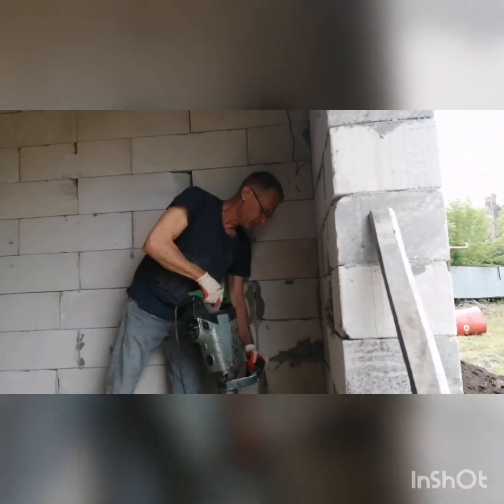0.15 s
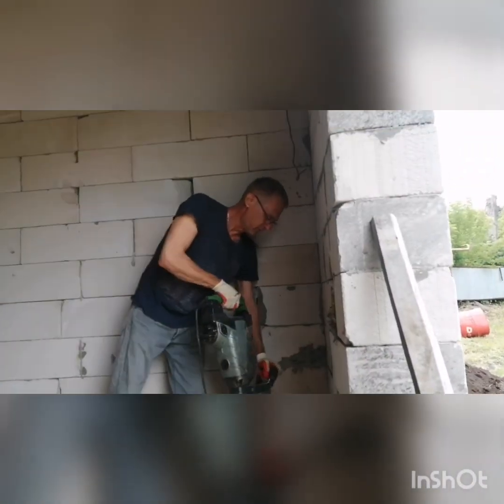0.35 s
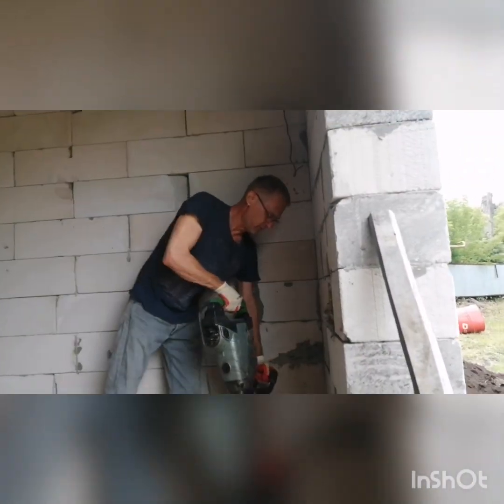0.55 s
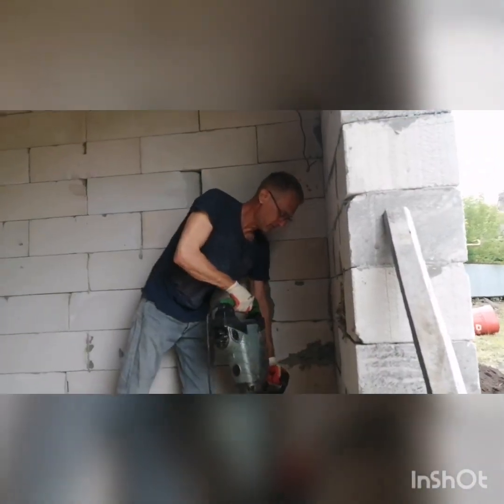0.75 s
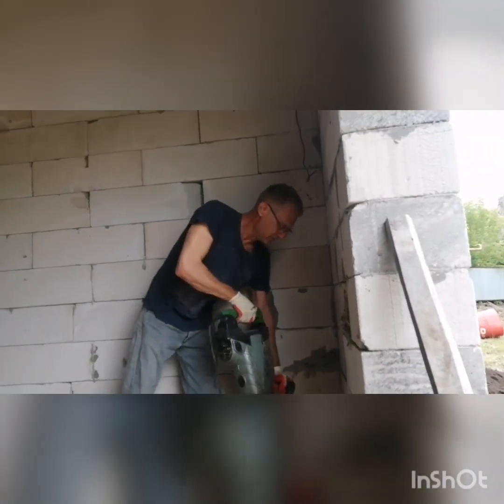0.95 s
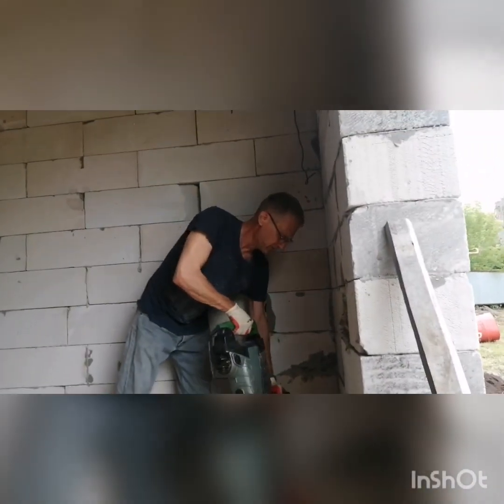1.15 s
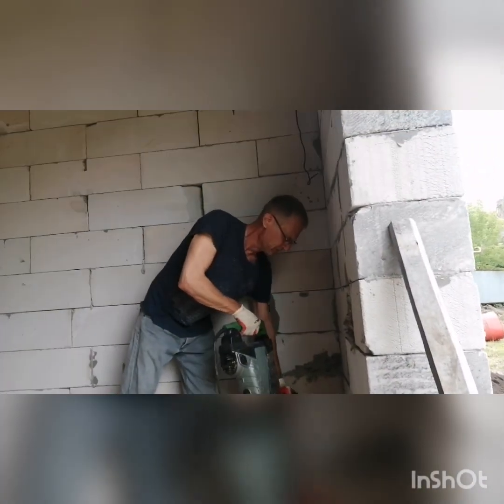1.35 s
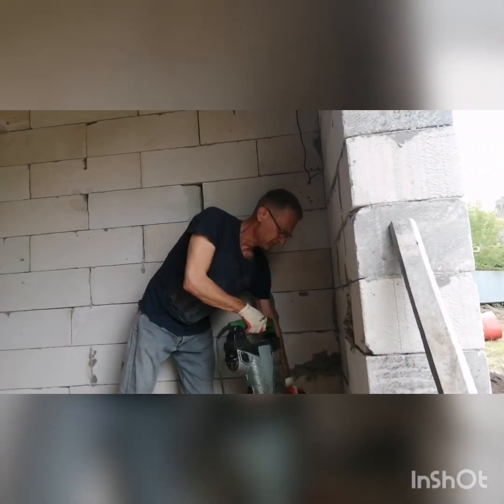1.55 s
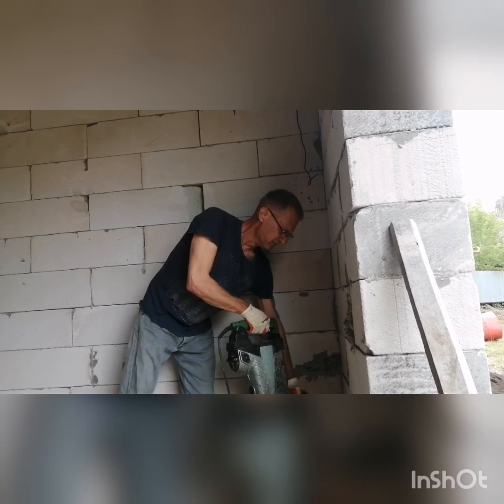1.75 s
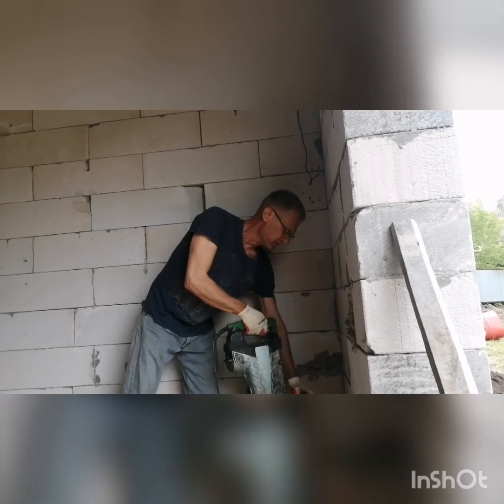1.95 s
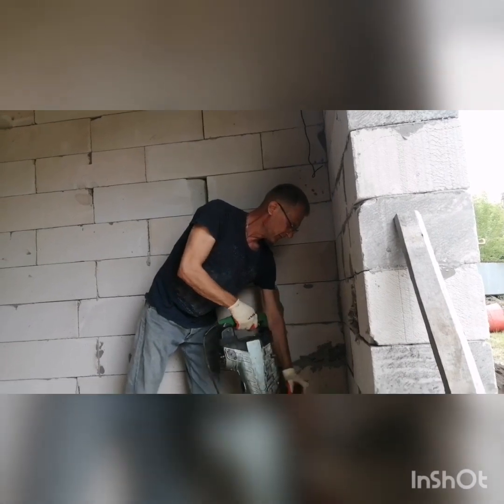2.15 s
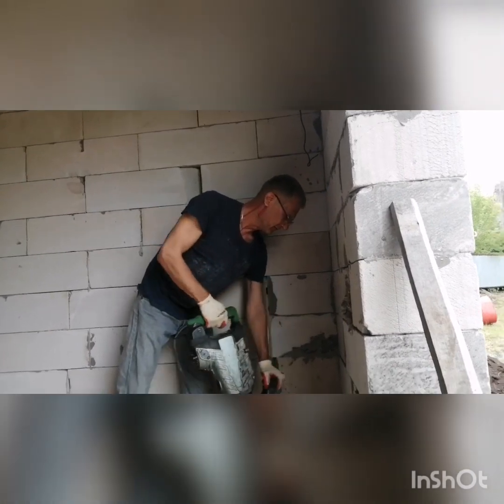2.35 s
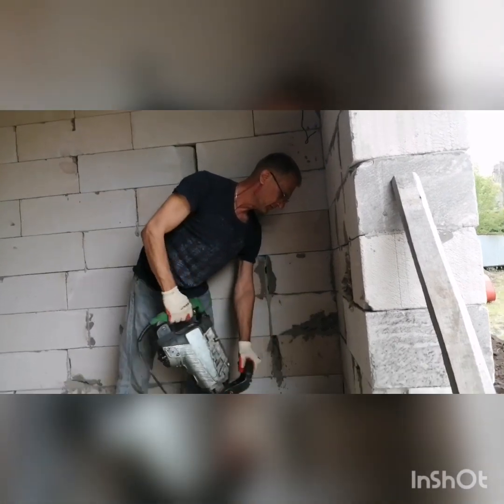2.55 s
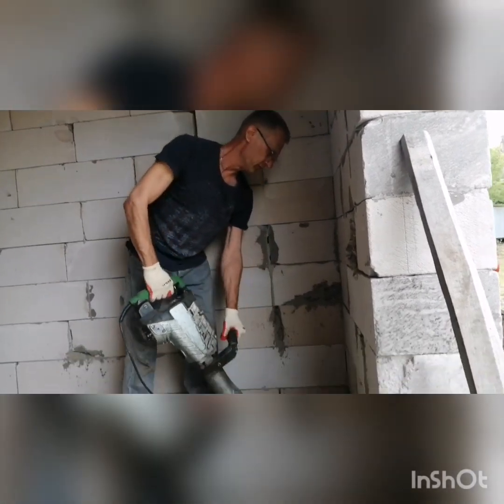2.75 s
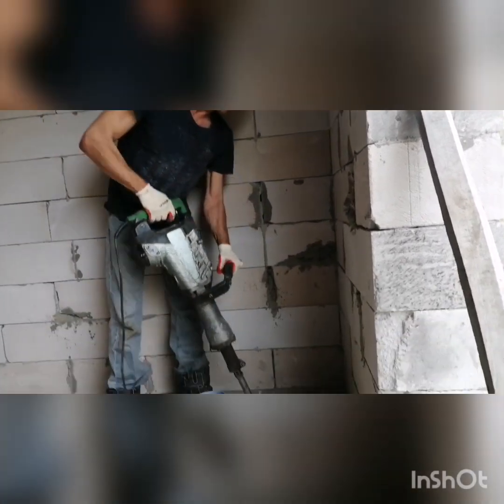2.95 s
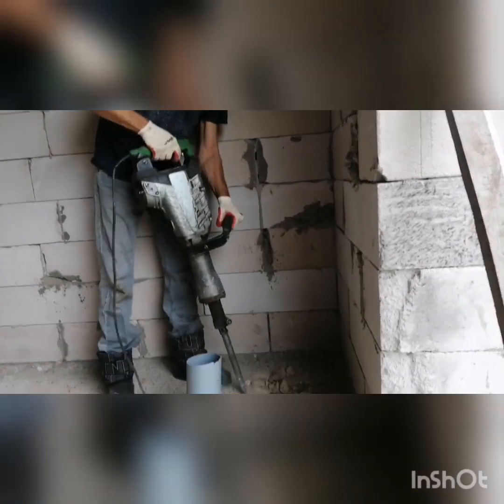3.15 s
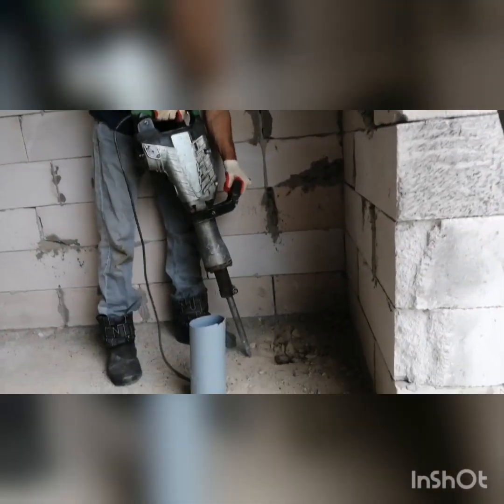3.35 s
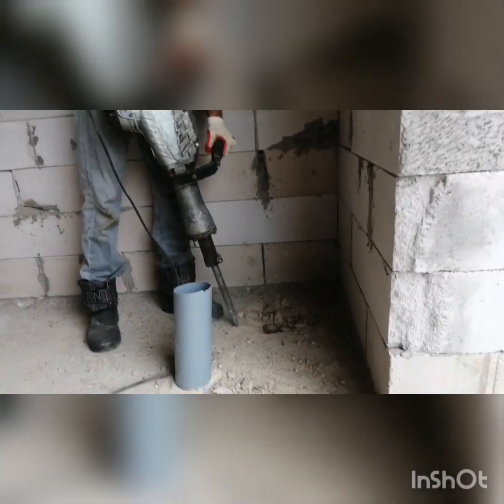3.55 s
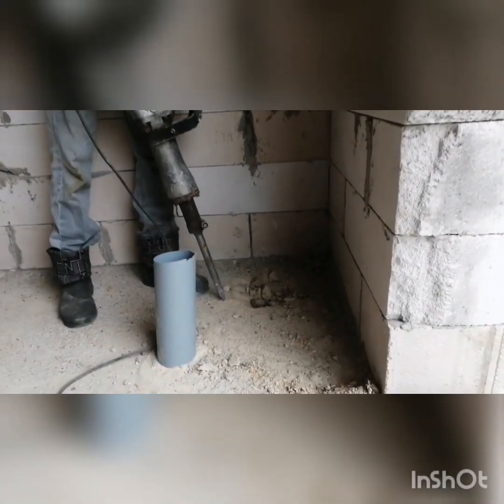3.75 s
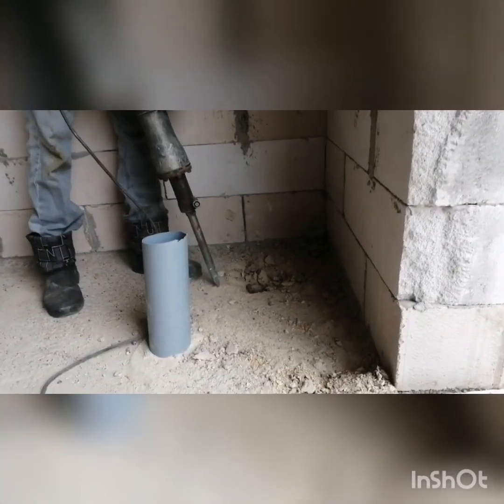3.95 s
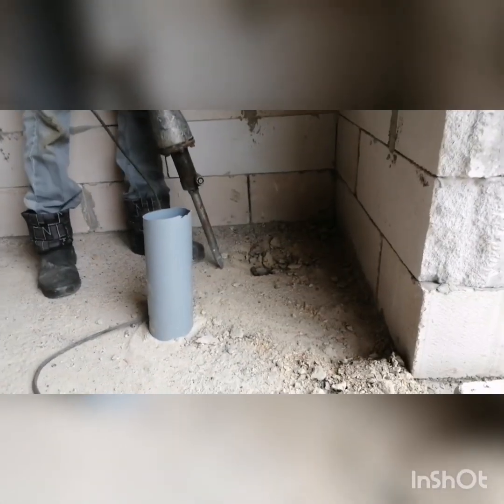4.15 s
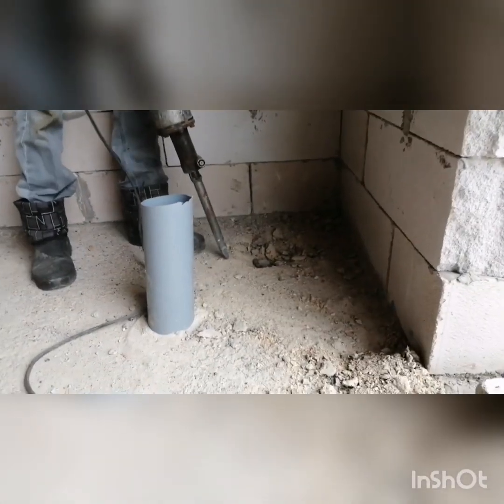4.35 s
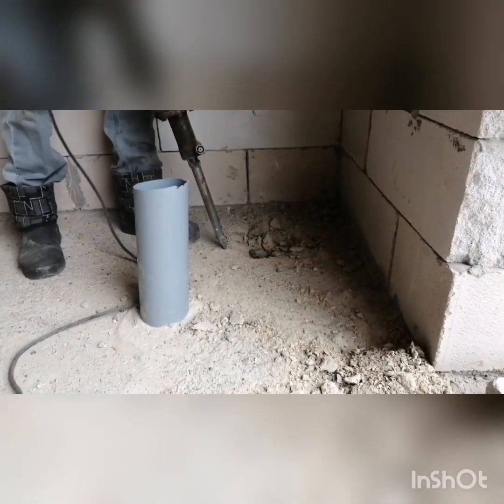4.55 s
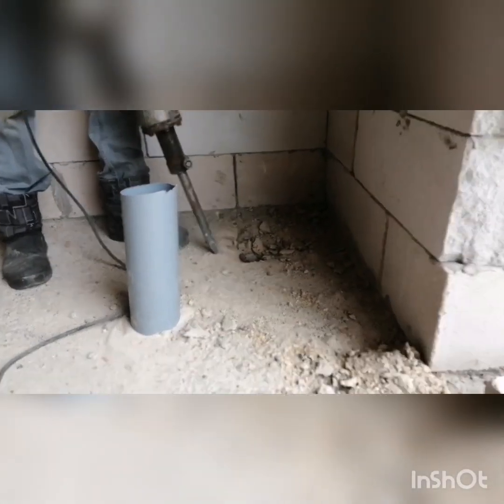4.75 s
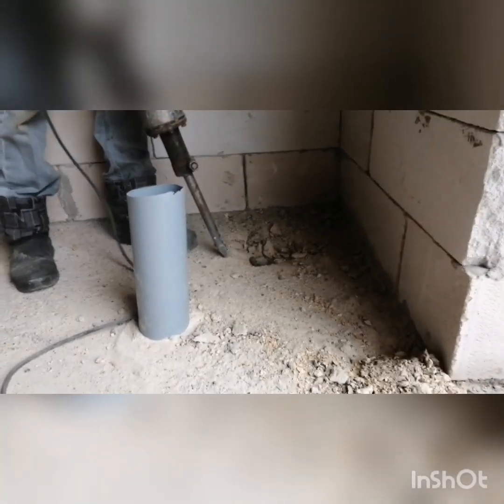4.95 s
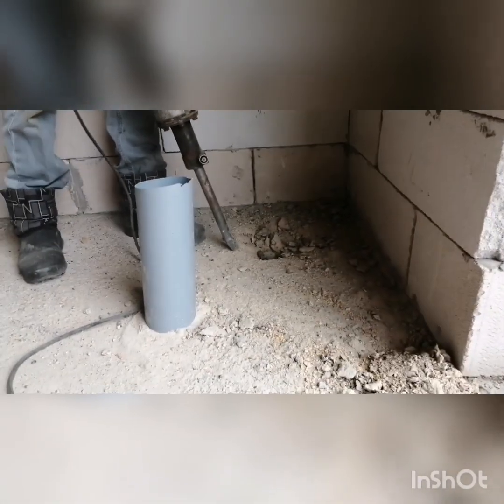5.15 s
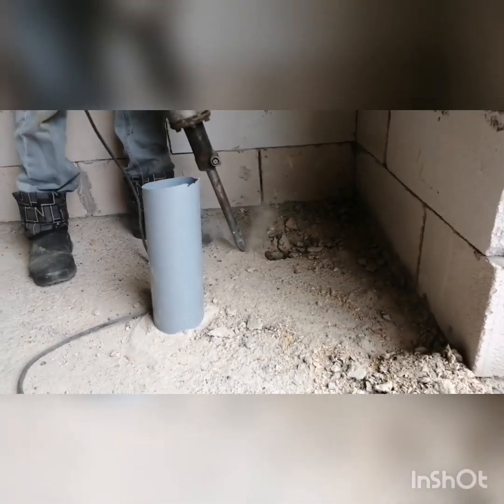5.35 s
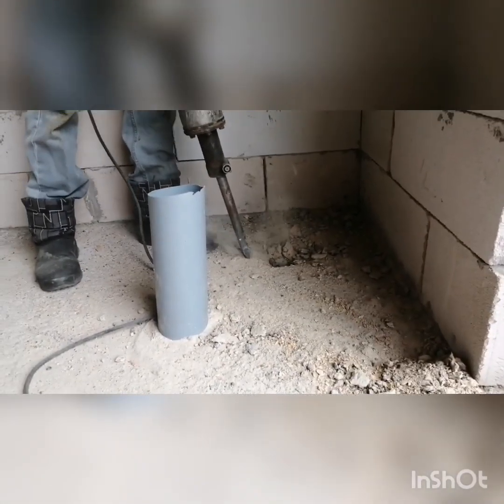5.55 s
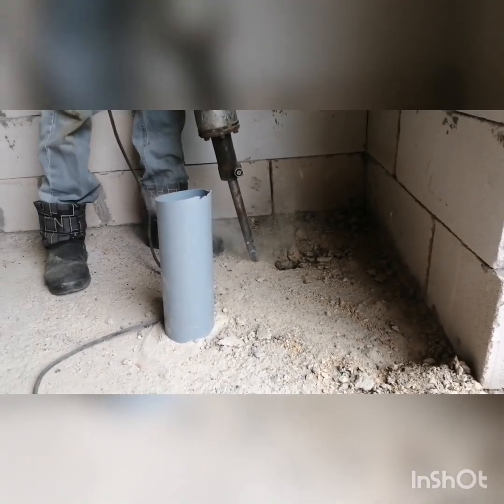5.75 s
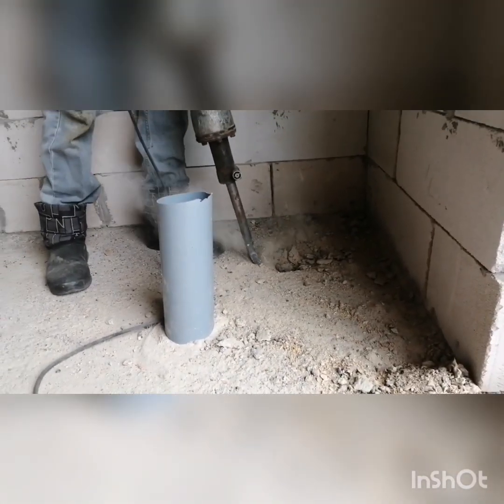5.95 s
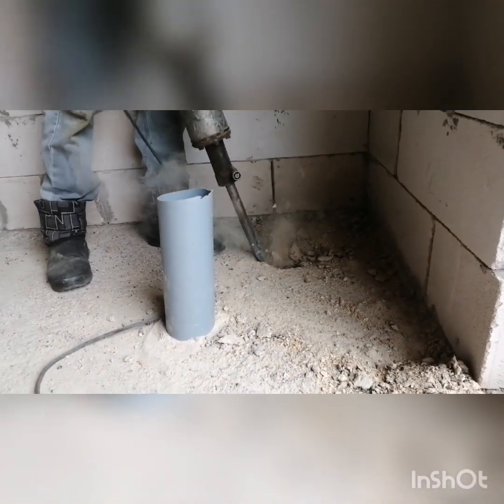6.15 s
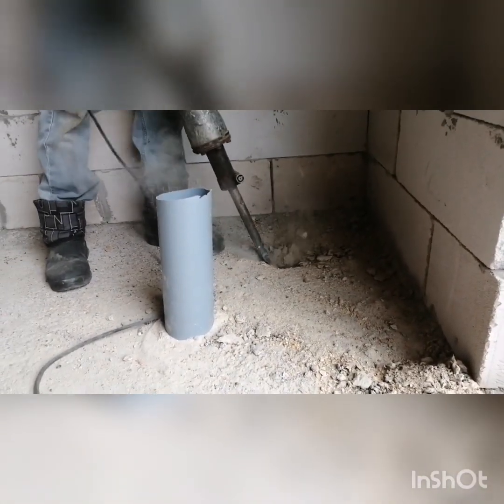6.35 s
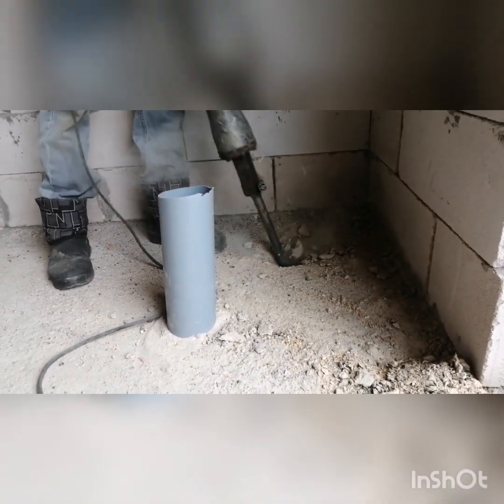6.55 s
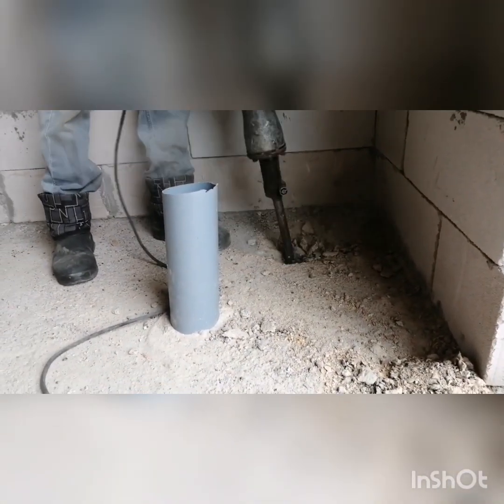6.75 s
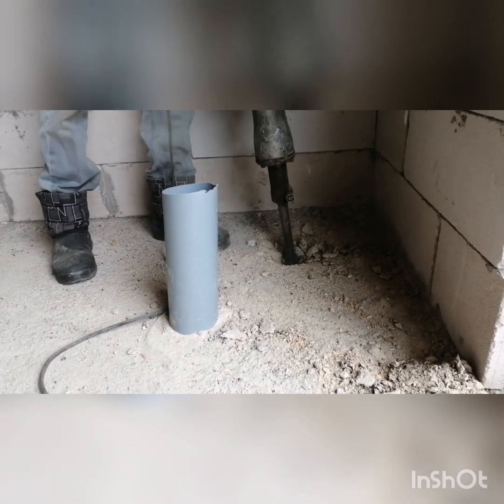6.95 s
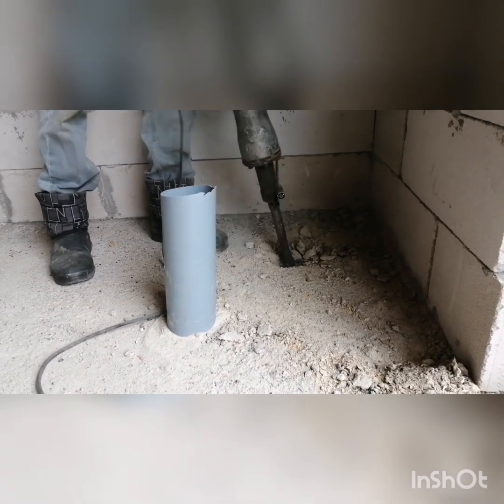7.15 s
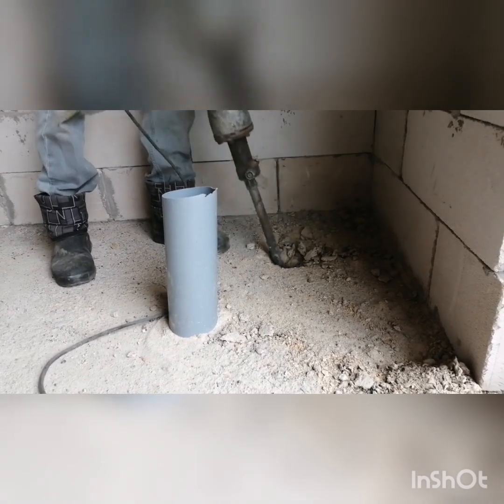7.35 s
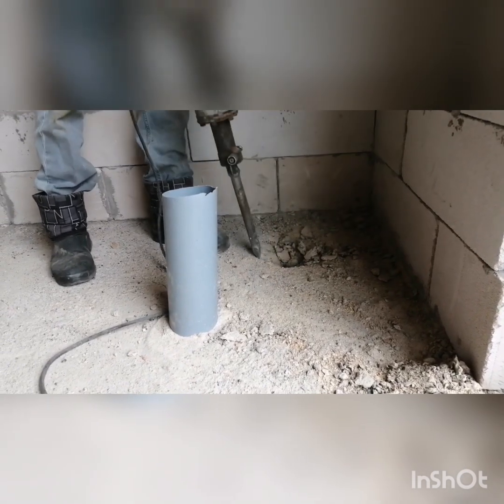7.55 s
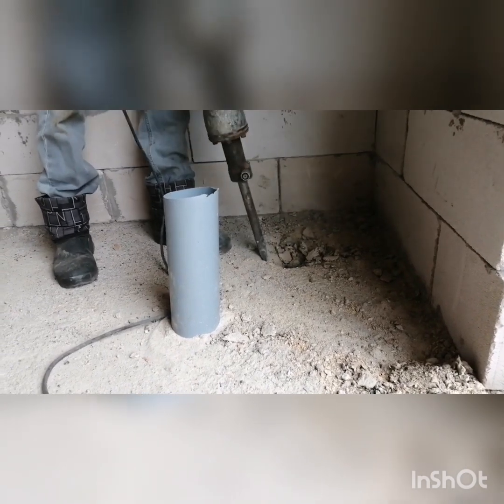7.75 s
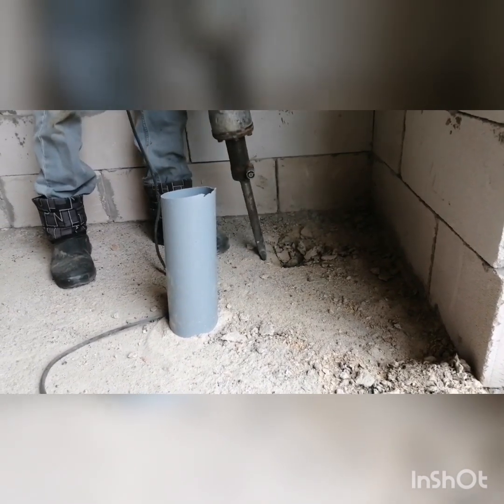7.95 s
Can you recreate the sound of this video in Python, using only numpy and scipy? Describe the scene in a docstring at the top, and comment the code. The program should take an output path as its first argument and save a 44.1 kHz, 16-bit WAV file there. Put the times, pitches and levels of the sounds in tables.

```python
"""Demolition hammer on a concrete floor

An electric hammer chisels concrete in a bare block-walled room, in two bursts that each run down blow by blow.
Every blow excites a damped slab, low room-corner modes and tool modes, bursts of crack noise and the ringing
steel chisel. Between bursts the tool is shifted: the chisel knocks in its holder and judders in stick-slip over
the floor. Motor noise follows speed and load, and decaying noise bands form the room's reverberation."""
import sys
import numpy as np
from scipy import signal
from scipy.fft import rfft, irfft, next_fast_len
from scipy.io import wavfile
from scipy.ndimage import uniform_filter1d, map_coordinates

SR = 44100
rng = np.random.default_rng(int(sys.argv[2]) if len(sys.argv) > 2 else 0)


def transcribe(signal):
    """Save signal, clipped to [-1, 1], as a 16-bit WAV file at the path in sys.argv[1]."""
    frames = np.atleast_2d(signal).T
    limited = np.clip(frames, -1, 1)
    pcm = np.round(limited * 32767).astype(np.int16)
    wavfile.write(sys.argv[1], SR, pcm)


N = 356769
TIME = np.arange(N) / SR   # [s]

# levels in the tables are relative: each source adds its own gain
# tool holder modes: (frequency [Hz], level [dB], t60 [s], roughness [0-1])
HOLDER_MODES = [(1051, 4.5, 0.068, 0.5), (1197, -5, 0.066, .1), (2227, -8, .06, .1), (2633, 0.5, .06, 0.4),
                (3030, -7, .05, .1)]
# noise spectrum of the rumbling casing and rattling housing: (frequency [Hz], level [dB])
RUMBLE_SPECTRUM = [(30, -27), (120, -32.5), (200, 2.5), (300, 3), (440, -2.5), (680, -1), (2000, -57.5)]


def hammer():
    """Impact excitation: steady and lone driven blows strike the same chisel, tool and floor."""
    # blows heard singly as the striker starts and runs down: (time [s], slab thud [dB],
    # barrel clank [dB], housing [dB], chisel ring [dB], crack [dB])
    lone_blows = [(0.488, -35, -21, -34, -42, -33), (.513, -42, -22.5, -34, -21.5, -27),
                  (2.072, -66, -58, -34.5, -30, -36), (2.145, -61, -54, -40, -30, -36),
                  (2.227, -45, -35, -32.5, -32.5, -33), (2.327, -49, -33.5, -30.5, -34, -33),
                  (2.451, -56, -30.5, -33.5, -35.5, -32), (2.615, -56, -36, -38.5, -39.5, -34.5),
                  (6.992, -38, -44, -34.5, -30.5, -26.5), (7.064, -43, -51, -40, -29.5, -31),
                  (7.153, -41, -38, -39, -26.5, -29)]
    steady = steady_blows()
    s, thud, clank, housing, chisel, crush = np.vstack([steady, lone_blows]).T
    is_steady = np.arange(len(s)) < len(steady)
    shock_db = np.where(is_steady, -16, -22.5)   # a lone blow shakes the floor less
    rows = np.c_[s, housing, thud, clank, chisel, crush]
    blows = contacts(rows, slab_db=5.5, housing_db=-2.5, shock_db=shock_db, barrel_db=-1.0,
                     chisel_db=-2.5, crack_db=1.5, slab_hz=942, crack_t60=0.043, ring_share=0.97)
    return blows + casing_rumble(s, housing - 28) + tool_body(s + 0.00105, thud, clank)


def steady_blows():
    """Crank kinematics give one blow a turn; the chisel's seating sets what answers, with random scatter."""
    # rate of the striker in each burst, as it spins up, works and runs down: (time [s], rate [blows/s])
    striker_rates = [
        [(0.458, 0.0), (0.525, 21.12), (1.136, 20.55), (1.18, 26.14), (1.226, 20.92), (1.946, 20.49),
         (1.986, 16.0), (2.455, 6.77), (3.218, 0.0)],
        [(5.059, 0.0), (5.111, 12.55), (5.364, 20.48), (5.834, 21.81), (6.127, 20.64), (6.37, 22.88),
         (6.85, 22.51), (6.974, 15.48), (7.5, 0.0)],
    ]
    # the steady part of each burst: (start [s], end [s])
    working_spans = [(.54, 2.04), (5.1, 6.96)]
    # moments when the chisel bites extra hard: (time [s], extra housing level [dB])
    hard_bites = [(.66, 8.5), (.8, 8), (5.2, 5), (6.57, 16), (6.88, 2)]
    # moments when the chisel bounces and rings out: (time [s], extra ring level [dB])
    hard_rings = [(.755, 3), (.947, 6.5), (.995, 4.5), (1.755, 6), (6.53, 5)]
    hard_crack_share = 0.27   # part of a hard bite's extra level that also goes into the crack
    scatter_db, bite_ring_db = 1.0, 1   # spread from blow to blow; a blow that bites rings less

    s = np.concatenate([blow_times(rate, span) for rate, span in zip(striker_rates, working_spans)])
    bite, *chance = rng.standard_normal((len(s), 6)).T
    thud, clank, housing, chisel, crush = seating(s) + scatter_db * np.array(chance)
    for when, extra_db in hard_bites:
        nearest = np.argmin(np.abs(s - when))
        housing[nearest] += extra_db
        crush[nearest] += hard_crack_share * extra_db
    for when, extra_db in hard_rings:
        chisel[np.argmin(np.abs(s - when))] += extra_db
    return np.c_[s, thud, clank, housing, chisel - bite_ring_db * bite, crush]


def blow_times(rate, span):
    """Phase accumulation: the striker lands halfway through every turn of the crank."""
    turns = np.cumsum(in_time(rate)) / SR
    s = np.interp(np.arange(.5, turns[-1]), turns, TIME)
    return s[(s > span[0]) & (s < span[1])]


def seating(times):
    """Contact coupling: how the chisel is seated sets the level of each response at the given times."""
    # in each burst: (time [s], slab thud [dB], barrel clank [dB], housing [dB], chisel ring [dB], crack [dB])
    seat_levels = [
        [(.52, -33, -26, -31.5, -27.5, -28), (.88, -26, -22, -31.5, -32, -30),
         (1.12, -46, -38, -39.5, -31.5, -29.5), (1.3, -51, -36, -31, -33, -30.5),
         (2.0, -62, -41, -35.5, -31, -30.5)],
        [(5.12, -24, -34, -28.5, -31.5, -27), (5.3, -25.5, -31.5, -29.5, -29.5, -26),
         (5.5, -21.5, -31, -30.5, -36.5, -24), (5.74, -22, -29.5, -31.5, -34, -25.5),
         (5.84, -20, -27.5, -27, -28.5, -26.5), (5.93, -19.5, -31.5, -30, -32, -23.5),
         (6.11, -22.5, -22.5, -41, -33.5, -25.5), (6.18, -31, -34.5, -32, -35, -24),
         (6.53, -27.5, -29, -31, -31, -26), (6.61, -45, -42, -69, -29.5, -28.5),
         (6.8, -36, -35, -38, -33.5, -26), (6.88, -44, -32.5, -46, -28.5, -25),
         (6.93, -40, -51, -47, -33.5, -31)],
    ]
    s, *columns = np.vstack(seat_levels).T
    return [np.interp(times, s, column) for column in columns]


def contacts(rows, slab_db, housing_db, shock_db, barrel_db, chisel_db, crack_db,
             slab_hz, crack_t60, ring_share):
    """Shared impact: one contact of steel and floor excites modes and noise bursts together."""
    # chisel modes, before each call scales their ring times: (frequency [Hz], level [dB], t60 [s], roughness
    # [0-1])
    chisel_modes = [(2320, -14.5, 0.25, 0.8), (4397, -7, 0.14, 0.88), (5200, -9.5, 0.08, .95),
                    (6714, 2.5, 0.22, 0.15), (6707, 6.5, 0.1, 1), (6810, -4.5, 0.46, 0.07),
                    (6980, 8, 0.029, 0.29), (7220, -6.5, 0.093, 0.7), (7130, 0.5, 0.037, 0.73),
                    (9560, -6, 0.2, 0.1), (9760, -5.5, 0.055, .95), (12740, -5.5, 0.13, 0.9),
                    (13030, -13, 0.61, .7), (13960, -13.5, .22, .85)]
    # dense clank of the barrel's other parts: (frequency [Hz], level [dB])
    clank_spectrum = [(1500, -8), (2000, -4), (2270, -3.5), (2650, -1.5), (2950, -1), (3400, -0.5),
                      (4000, -46)]
    # cracking concrete: (frequency [Hz], level [dB])
    crack_spectrum = [(500, -12), (1200, 3.5), (1600, -3), (3000, 4), (3800, 1), (4400, 7), (5400, 6.5),
                      (7000, 7), (8200, 2.5), (11000, -1), (12800, 1), (14800, 5.5), (16000, -39)]

    s, housing, thud, clank, chisel, crush = np.transpose(rows)
    floor = slab(s - .0005, thud + slab_db, slab_hz)
    jolt_db = housing + housing_db
    drone = corner_ring(s - .001, jolt_db)
    # loose parts of the housing
    rattle = clatter(s - .001, jolt_db + 1, RUMBLE_SPECTRUM, t60=0.027, rebound_db=-34.0)
    shock = floor_shock(s - .002, 0.49 * housing + 0.34 * thud + shock_db)
    barrel = clatter(s + 0.001, clank + barrel_db, clank_spectrum, t60=0.043, rebound_db=-12.5)
    crack = clatter(s + 0.00058, crush + crack_db, crack_spectrum, crack_t60, rebound_db=-11.0)
    # each call scales the ring times: driven blows keep nearly all, knocks of the idle tool somewhat less
    modes = [(hz, db, t60 * ring_share, rough) for hz, db, t60, rough in chisel_modes]
    # the ring reaches each port differently
    steel = [detuned(struck(modes, s + 0.00066, chisel + chisel_db, spread_s=0.0016), wander_s=0.000204)
             for port in range(2)]
    return floor + drone + rattle + shock + barrel + crack + np.array(steel)


def slab(times, level_db, hz):
    """Heavy damping: three equal resonances in series let the floor swing only once or twice."""
    swing = np.eye(1, 1024)[0]   # a single impulse
    for _ in range(3):
        swing = ring(swing, hz, 0.0016)
    swing = np.diff(swing)
    swing = swing / np.abs(swing).max()
    return signal.oaconvolve(clicks(times, from_db(level_db)), swing)[:N]


def struck(modes, times, level_db, spread_s, scatter_db=2):
    """Modal synthesis: each blow reaches each mode with its own strength and lag; chatter roughens the ring."""
    out = 0
    chatter = rms_one(drift(330))
    for hz, mode_db, t60, rough in modes:
        lag, strength = rng.standard_normal((len(times), 2)).T
        sizes = from_db(level_db + mode_db + scatter_db * strength)
        rough = np.clip(rough, 0, 1)
        roughness = np.sqrt(1 - rough) + np.sqrt(rough) * chatter
        out = out + roughness * ring(clicks(times + spread_s * np.abs(lag), sizes), hz, t60)
    return out


def detuned(x, wander_s):
    """Varying delay: changing contact pressure pulls the steel's pitch to and fro."""
    return map_coordinates(x, [(TIME + wander_s * drift(25)) * SR], order=3, prefilter=False)


def clatter(times, level_db, spectrum, t60, rebound_db):
    """Decaying noise: a dense burst at each contact, and a second one on the rebound."""
    chance = rng.standard_normal((len(times), 2))
    first = clicks(times, from_db(level_db))
    rebound_times = times + 0.0191 + 0.0037 * chance[:, 0]
    second = clicks(rebound_times, from_db(level_db + rebound_db + 2 * chance[:, 1]))
    envelope = uniform_filter1d(fading(first + second, t60), size=80)
    return envelope * rms_one(coloured(air_noise(), spectrum))


def corner_ring(times, level_db):
    """Fixed eigenmodes: every jolt sets the room corner droning on the same few low notes."""
    # (frequency [Hz], level [dB])
    corner_modes = [(190, -14.5), (218, -19.5), (261, -15), (293, -20), (342, -19.5), (381, -18.5),
                    (430, -19.5), (582, -19), (692, -27)]
    jolts = clicks(times, from_db(level_db))
    out = 0
    for k, (hz, db) in enumerate(corner_modes):
        out = out + (-1) ** k * from_db(db) * ring(jolts, hz, t60=0.12)   # neighbours in opposite phase
    return out


def casing_rumble(times, level_db):
    """Slow energy decay: every jolt leaves the heavy casing rumbling."""
    # (frequency [Hz], level [dB])
    casing_spectrum = [(60, -22), (150, -7.5), (192, 1), (235, -3), (290, -6.5), (370, -22.5), (700, -21),
                       (1500, -61)]
    envelope = fading(clicks(times, from_db(level_db)), t60=0.6)
    return envelope * rms_one(coloured(air_noise(), casing_spectrum))


def tool_body(times, thud_db, clank_db):
    """Modal response: a solid blow makes the holder knock and the barrel clank, each at its own pitches."""
    # (frequency [Hz], level [dB], t60 [s], roughness [0-1])
    barrel_modes = [(2290, -5, .04, .2), (2500, -8, .035, .2), (2940, -3, .04, .2)]
    holder = struck(HOLDER_MODES, times, thud_db - 11, spread_s=.0001, scatter_db=1.5)
    barrel = [struck(barrel_modes, times, clank_db, spread_s=.0006, scatter_db=0.5) for port in range(2)]
    return holder + np.array(barrel)


def floor_shock(times, level_db):
    """Structure-borne shock: the floor carries it as a short deep bump of noise."""
    # (frequency [Hz], level [dB])
    shock_spectrum = [(20, 7), (50, -10.5), (100, 3.5), (200, -15.5), (600, -53)]
    jolt = fading(clicks(times, from_db(level_db)), t60=.06)
    return uniform_filter1d(jolt, size=130) * rms_one(coloured(air_noise(), shock_spectrum))


def floor_jolts():
    """Structure-borne shock: some blows shake the whole floor."""
    # (time [s], level [dB])
    jolt_rows = [(.752, -42), (.944, -41), (.992, -39), (1.269, -34), (1.557, -39), (1.945, -43.5),
                 (6.259, -33), (6.304, -32), (6.524, -31.5), (6.569, -33), (6.656, -42), (6.745, -31),
                 (6.878, -36), (6.994, -33), (7.154, -42)]
    return floor_shock(*np.transpose(jolt_rows))


def motor(flutter_db):
    """Power law of speed: fan and gears rush unevenly over casing rumble; both also follow load."""
    # switched on and off, levels under full load: (on [s], off [s], rush [dB], rumble [dB])
    motor_runs = [(0.442, 1.783, -40.5, -37.5), (5.032, 7.312, -45.5, -62)]
    # (frequency [Hz], level [dB])
    rush_spectrum = [(300, -16), (560, -14), (1100, 1.5), (1500, -0.5), (2450, 4.5), (3100, 0), (3900, -6),
                     (6200, 3), (7500, -6.5), (15000, -19.5)]
    spin_up_s, coast_s, speed_law = 0.037, 1.86, 2.07
    load_db = seating(TIME)[0] + 17.5   # slab thud relative to full load
    rush_follows, rumble_follows = 0.12, 0.61   # dB per dB of load

    rush = rumble = 0
    for on, off, rush_db, rumble_db in motor_runs:
        spin_up = np.clip((TIME - on) / spin_up_s, 0, 1)
        coast = np.clip(1 - (TIME - off) / coast_s, 0, 1)
        loudness = (spin_up * coast) ** speed_law
        rush = rush + loudness * from_db(rush_db + rush_follows * load_db)
        rumble = rumble + loudness * from_db(rumble_db + rumble_follows * load_db)
    rush = rush * from_db(flutter_db * drift(120))
    rush_sound = rush * rms_one(coloured(air_noise(), rush_spectrum))
    return rush_sound + rumble * rms_one(coloured(air_noise(), RUMBLE_SPECTRUM))


def handling():
    """Softer impact: knocks of the idle tool let the free chisel ring and the heavy casing rumble."""
    # the tool knocked, lifted and set down: (time [s], housing [dB], slab [dB], chisel ring [dB], crack [dB])
    knock_rows = [(2.792, -90, -78, -42, -67), (2.845, -61, -54, -22.5, -42),
                  (3.202, -41.5, -44, -48.5, -51), (3.234, -62, -55, -28.5, -61),
                  (3.267, -45, -42, -32, -45), (3.312, -35, -40, -25.5, -43.5),
                  (3.333, -39.5, -40, -52, -43), (3.652, -61, -62, -66, -43),
                  (3.727, -75, -64.5, -57.5, -51), (4.303, -47, -76, -80.5, -86),
                  (4.349, -41.5, -43, -59, -65), (4.399, -50, -47, -52, -55), (4.543, -88, -93, -37.5, -49),
                  (4.681, -34, -28.5, -30, -35.5), (4.699, -63, -47, -62, -72),
                  (5.046, -72, -67, -38.5, -42), (7.66, -48, -39.5, -55, -59),
                  (7.682, -78, -48, -22.5, -48), (7.706, -44, -37.5, -25.5, -37),
                  (7.753, -49.5, -31.5, -50, -35.5), (7.796, -86, -45, -20.5, -30.5),
                  (7.821, -80, -73, -41, -40), (8.064, -40, -32, -23, -32)]
    # sideways taps on the chisel: (time [s], level [dB])
    tap_rows = [(.801, -28), (3.871, -57), (4.352, -44), (5.746, -26), (7.15, -58)]
    # the chisel's bending modes: (frequency [Hz], level [dB], t60 [s], roughness [0-1])
    bending_modes = [(2380, -9, 0.13, .7), (4480, 0, 0.07, .7)]
    barrel_share = 0.11   # how far the barrel follows the housing's jolt rather than the crack
    body_db = -8.5        # a knock rings holder and barrel less than a driven blow

    s, housing, thud, chisel, crush = np.transpose(knock_rows)
    clank = barrel_share * housing + (1 - barrel_share) * crush
    rows = np.c_[s, housing, thud, clank, chisel, crush]
    knocks = contacts(rows, slab_db=1.0, housing_db=-2, shock_db=-24.0, barrel_db=-5.5,
                      chisel_db=-12.0, crack_db=0.5, slab_hz=824.0, crack_t60=0.025, ring_share=0.88)
    taps = struck(bending_modes, *np.transpose(tap_rows), spread_s=.0005)
    duller = coloured(knocks + taps, [(7000, 3.0), (14000, -5)])
    body = tool_body(s + 0.00098, thud + body_db, clank + body_db)
    return duller + casing_rumble(s, housing - 13) + body


def drag(grit_share, ring_share, level_db):
    """Stick-slip friction: each slip of the tip rattles the tool, rings its holder and grinds some grit."""
    # strokes over the floor, slip rate before jitter:
    # (time [s], length [s], level [dB], slip rate at start [Hz], and at end [Hz])
    strokes = [(-.03, 0.032, -41, 448.4, 443), (0.013, .07, -40, 447.7, 459), (0.176, .09, -40, 379.5, 375),
               (0.315, 0.054, -37, 377.4, 375), (0.35, 0.08, -34.5, 378.3, 385),
               (0.432, 0.046, -31.5, 378.5, 396), (3.059, .11, -58, 383, 380),
               (5.058, .06, -38.5, 601.7, 500), (7.204, .1, -51, 668.7, 635),
               (7.313, .06, -44.5, 623.5, 598), (7.43, 0.071, -42, 572.3, 553),
               (7.564, .05, -37.5, 541, 520)]
    # resonances of the dragged chisel and tool: (frequency [Hz], level [dB])
    drag_spectrum = [(250, -19.5), (400, -14.5), (560, -6), (760, -12.5), (950, -8), (1250, -3.5),
                     (1550, -10), (2300, -0.5), (3900, -13), (5700, -9), (8500, -20), (15000, -35)]

    judder = []
    for s, length, _, from_hz, to_hz in strokes:
        judder += [(s, from_hz), (s + length, to_hz)]
    jitter = 1 + .033 * drift(400) + .015 * drift(30)
    cycles = np.cumsum(in_time(judder) * jitter) / SR
    # one impulse at every whole cycle, of uneven strength
    slips = np.diff(np.floor(cycles), prepend=0) * from_db(2 * drift(300) + 2 * drift(25))
    # random phases smear each slip without colouring it
    smear = irfft(np.exp(2j * np.pi * rng.random((2, 257))))
    tone = rms_one(signal.oaconvolve([slips - slips.mean()], smear, axes=1)[:, :N])
    grinding = rms_one(fading(slips, t60=.012) * rng.standard_normal((2, N)))
    pressure = swells(strokes, attack_s=.032, release_s=.36)
    scrape = rms_one(coloured(tone + grit_share * grinding, drag_spectrum))
    ringing = rms_one(sum(ring(scrape, hz, t60) for hz, _, t60, _ in HOLDER_MODES))
    return from_db(level_db) * pressure * rms_one(scrape + ring_share * ringing)


def squeals():
    """Friction lock-in: for a moment the slipping tip catches and squeals on one wavering tone."""
    # pitch before its waver: (start [s], end [s], start pitch [Hz], end pitch [Hz], level [dB])
    squeal_rows = [(.005, 0.097, 1342, 1342, -38), (0.01, .125, 905, 907, -45),
                   (0.22, 0.28, 1127, 1170, -42), (.365, .485, 1146, 1176, -52),
                   (0.393, 0.461, 1900, 2070, -41), (0.429, 0.49, 2194, 2355, -32),
                   (5.049, 5.07, 750, 484, -45), (5.066, 5.132, 581, 560, -36),
                   (5.058, 5.121, 2324, 2215, -42.5), (7.279, 7.462, 656, 559, -51),
                   (7.583, 7.635, 1620, 1590, -46), (7.346, 7.385, 1270, 1230, -44),
                   (7.446, 7.527, 2234, 2196, -44.5), (7.44, 7.504, 1130, 1123, -41.5),
                   (7.502, 7.568, 548, 519, -49), (7.585, 7.635, 1142, 1113, -41)]
    out = 0
    for start, end, from_hz, to_hz, level_db in squeal_rows:
        progress = np.clip((TIME - start) / (end - start), 0, 1)
        waver = 1 + .026 * drift(400)
        hz = (from_hz + (to_hz - from_hz) * progress) * waver
        envelope = from_db(level_db + 2 * drift(170)) * np.sin(np.pi * progress)
        out = out + envelope * np.sin(2 * np.pi * np.cumsum(hz) / SR)
    return out


def chips():
    """Brittle fracture: bits of concrete snap under the tip, each with a dull body and a bright edge."""
    # (time [s], body [dB], edge [dB])
    chip_rows = [(3.209, -50, -45.5), (3.365, -44.5, -53), (3.639, -59, -48), (4.354, -57, -51),
                 (4.421, -55, -52), (4.439, -54, -45), (4.561, -71, -42), (4.701, -43, -50),
                 (4.787, -47, -64), (4.808, -43, -56), (4.885, -50.5, -74), (4.899, -53, -59)]
    # body and edge: (frequency [Hz], level [dB])
    body_spectrum = [(200, -22), (600, 5), (1200, 12.5), (1700, -5), (3300, 7), (4000, -23), (12000, -45)]
    edge_spectrum = [(1500, -23), (3800, -10), (4700, 6), (7200, 5), (8500, -4), (15000, -28)]
    s, body, edge = np.transpose(chip_rows)
    dull = clatter(s, body, body_spectrum, t60=0.062, rebound_db=-30)
    return dull + clatter(s, edge, edge_spectrum, t60=0.017, rebound_db=-27)


def grit():
    """Granular noise: loose grit crunches under chisel and boots."""
    # (time [s], length [s], level [dB])
    crunches = [(3.58, 0.13, -56.5), (3.92, 0.015, -59), (4.36, 0.081, -60), (4.68, 0.046, -66),
                (4.79, 0.12, -68.5)]
    # (frequency [Hz], level [dB])
    grit_spectrum = [(450, -44), (900, -3), (3000, -7), (3600, -19), (4900, -9), (7000, -8.5), (9000, -18),
                     (15000, -37)]
    crunching = rms_one(coloured(grains(2400, 4.1, clump_db=5.5), grit_spectrum))
    return swells(crunches, attack_s=0.032, release_s=0.3) * crunching


def grains(per_s, size_db, clump_db):
    """Random point process: tiny fractures of very unequal size, in clumps."""
    spread_db = size_db * np.minimum(rng.exponential(1, N), 4)
    sizes = from_db(spread_db + clump_db * drift(110))
    happens = rng.random(N) < per_s / SR
    return rms_one(sizes * happens * rng.standard_normal((2, N)))


def boom():
    """Low-passed noise: a deeper boom swells now and then."""
    # (time [s], length [s], level [dB])
    boom_rows = [(3.3, 0.072, -51), (3.85, 0.18, -83), (4.68, 0.2, -57), (5.15, 3, -73.5),
                 (6.45, 0.62, -57)]
    # (frequency [Hz], level [dB])
    boom_spectrum = [(40, -10), (95, 5), (150, 6.5), (210, -7.5), (330, -47), (1000, -72.5)]
    envelope = swells(boom_rows, attack_s=0.025, release_s=0.89)
    return envelope * rms_one(coloured(air_noise(), boom_spectrum))


def room(x, first_echo_s):
    """Reverberation: bare walls return a dense tail that lasts longest in the low notes."""
    # (frequency [Hz], t60 [s])
    room_t60 = [(60, 0.94), (250, 0.99), (700, 0.58), (2000, 0.6), (5000, 0.34), (13000, 0.11)]
    # (frequency [Hz], level of the tail [dB])
    room_send = [(50, -16), (120, -12), (300, 1), (600, -5.5), (1200, -11.5), (2500, -7), (6500, -8),
                 (13000, -14)]
    t, hz = TIME[:SR], np.fft.rfftfreq(SR, 1 / SR)
    noise, tail = rfft(air_noise()[:, :SR]), 0
    centres = np.geomspace(50, 16000, 10)
    for centre, only in zip(centres, np.eye(len(centres))):
        onset = np.clip(t / first_echo_s - 1, 0, 1)
        decay = from_db(-60 * t / at_hz(room_t60, centre)) * onset
        decay = decay / np.sqrt(np.sum(decay ** 2))
        band = irfft(noise * at_hz(np.c_[centres, only], hz), SR)   # overlapping triangular bands
        tail = tail + band * decay * from_db(at_hz(room_send, centre))
    return signal.oaconvolve(x, tail, axes=1)[:, :N]


def ambience():
    """Stationary coloured noise: faint air from outside."""
    # (frequency [Hz], level [dB])
    ambience_spectrum = [(25, -17.5), (75, -8), (125, -11.5), (300, -16.5), (600, -20), (1000, -22.5),
                         (6500, -38.5), (15000, -42)]
    return from_db(-68.5) * rms_one(coloured(air_noise(), ambience_spectrum))


def from_db(db):
    """Logarithmic level: decibels to gain."""
    return 10 ** (np.asarray(db) / 20)


def rms_one(x):
    """Energy normalisation: scale a sound to an rms of 1."""
    return x / np.sqrt(np.mean(x ** 2) + 1e-20)


def in_time(rows):
    """Linear interpolation: a curve over time joined by straight lines."""
    return np.interp(TIME, *np.transpose(rows))


def at_hz(points, hz):
    """Logarithmic pitch: a spectrum joined on a log-frequency axis."""
    f, value = np.transpose(points)
    return np.interp(np.log(np.maximum(hz, 1)), np.log(f), value)


def drift(rate):
    """Band-limited randomness: normal random values about 0, `rate` a second, joined by lines."""
    knots = rng.standard_normal(4096)
    return np.interp(TIME * rate, np.arange(len(knots)), knots)


def swells(rows, attack_s, release_s):
    """Envelope: each row (start, length, dB) rises, holds, then falls by 60 dB in the release time."""
    out = 0
    for start, length, level_db, *_ in rows:
        rise = np.clip((TIME - start) / attack_s, 0, 1)
        fall_db = 60 * np.maximum(TIME - start - length, 0) / release_s
        out = np.maximum(out, rise * from_db(level_db - fall_db))
    return out


def coloured(x, spectrum):
    """Linear filtering: give a sound a smooth spectrum."""
    size = next_fast_len(N + 4096)
    gain = from_db(at_hz(spectrum, np.fft.rfftfreq(size, 1 / SR)))
    return irfft(rfft(x, size) * gain, size)[..., :N]


def air_noise():
    """Spatial coherence: white noise at two close ports, alike in the low and middle notes, unrelated in the
    deepest bass and the treble."""
    # (frequency [Hz], left-right correlation [-1 to 1])
    likeness = [(40, 0), (120, 0.96), (300, 0.93), (600, 0.94), (1200, 0.27), (2500, 0.091), (5000, 0)]
    size = next_fast_len(N)
    mid, side = rfft(rng.standard_normal((2, size)))
    alike = np.clip(at_hz(likeness, np.fft.rfftfreq(size, 1 / SR)), -.99, .99)
    ports = np.sqrt(1 + alike) * mid + np.sqrt(1 - alike) * side * [[1], [-1]]
    return irfft(ports, size)[:, :N]


def clicks(times, sizes):
    """Ideal impact: one impulse for each contact."""
    out = np.zeros(N)
    np.add.at(out, np.clip((times * SR).astype(int), 0, N - 1), sizes)
    return out


def fading(x, t60):
    """Exponential decay: each impulse dies away by 60 dB in t60 seconds."""
    return signal.lfilter([1], [1, -from_db(-60 / (t60 * SR))], x + 1e-18)


def ring(x, hz, t60):
    """Damped resonance: a unit click sets a sine of initial height 1 ringing."""
    r, w = from_db(-60 / (t60 * SR)), 2 * np.pi * hz / SR
    return signal.lfilter([0, np.sin(w)], [1, -2 * r * np.cos(w), r * r], x + 1e-18)


def scene():
    """Superposition: the tool and its floor, the bare room around them, and faint air from outside."""
    # the tool moves before the microphone: (time [s], left minus right [dB])
    pan = [(0, -5.5), (.7, 3.5), (1.2, 0.5), (2.2, -4.5), (3.3, -0.5), (4.3, 0.5), (6.2, 2.5), (7.2, 0),
           (7.7, 3)]
    near = hammer() + floor_jolts() + handling() + chips() + grit() + boom()
    near = near + squeals() + motor(flutter_db=4.5) + drag(grit_share=1.0, ring_share=0.15, level_db=1.0)
    near = near * from_db(in_time(pan) * [[.5], [-.5]])
    return near + room(near, first_echo_s=0.002) + ambience()


def record(dry):
    """Directivity: two ports face different ways and colour the sound differently; the top is cut."""
    # (frequency [Hz], left minus right [dB])
    port_difference = [(250, 0), (550, 2.5), (1200, -1.5), (1900, -8), (2900, -7), (4300, -9),
                       (5500, -13.5), (6700, -3.5), (8500, 2), (9800, 0), (12500, -12.5), (15000, -15.5)]
    ports = [coloured(x, [(hz, side * db / 2) for hz, db in port_difference]) for x, side in zip(dry, (1, -1))]
    low_pass = signal.ellip(12, .2, 80, 15700, fs=SR, output="sos")   # cutoff in Hz
    return signal.sosfilt(low_pass, np.array(ports))


dry = scene()
out = record(dry)
transcribe(out)
```